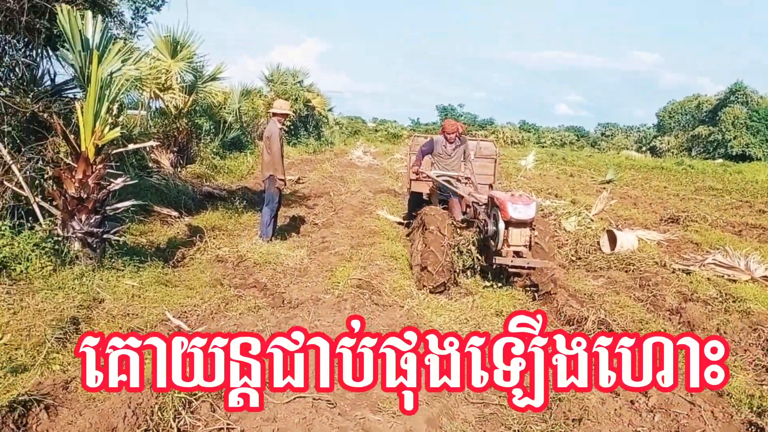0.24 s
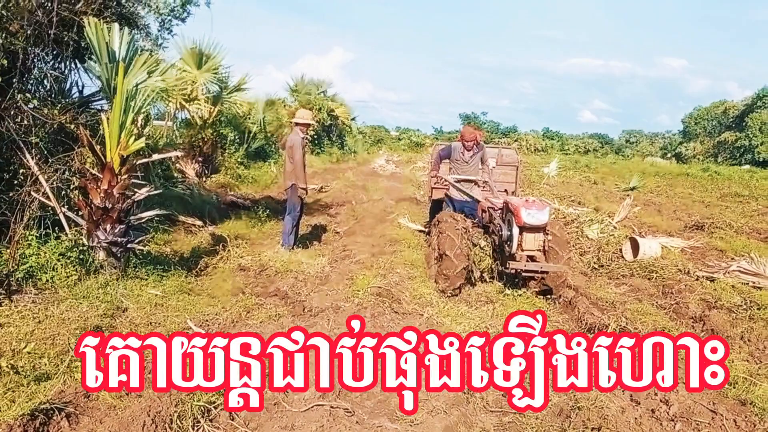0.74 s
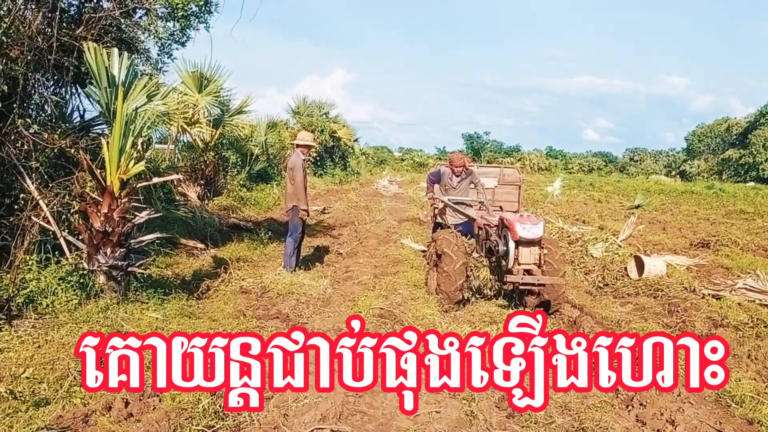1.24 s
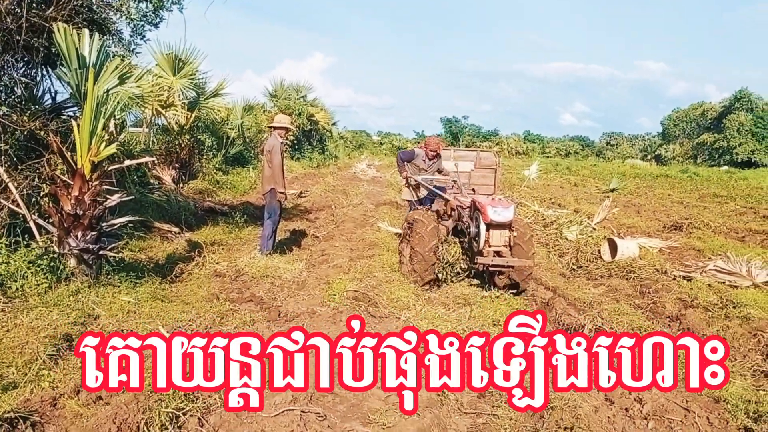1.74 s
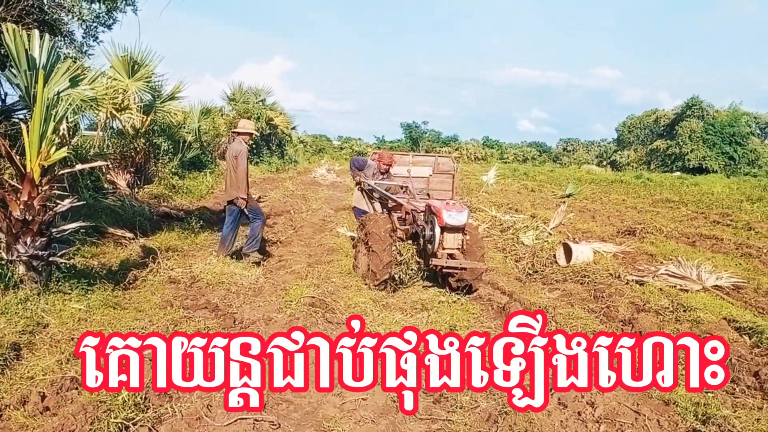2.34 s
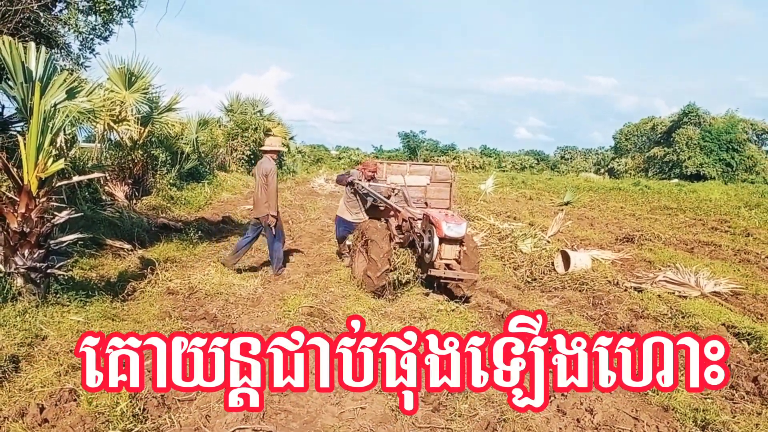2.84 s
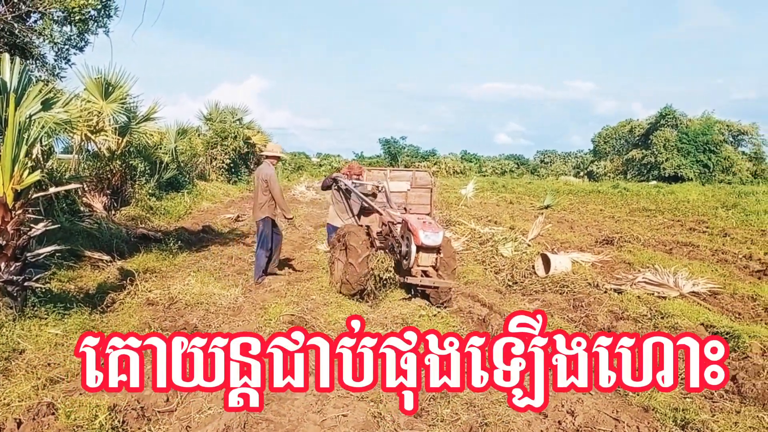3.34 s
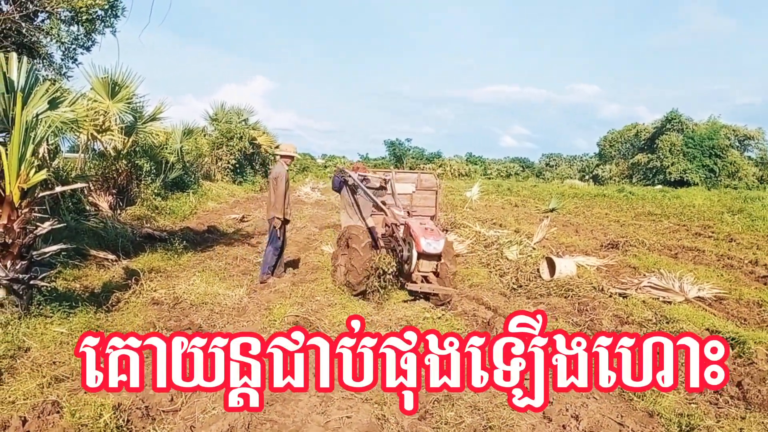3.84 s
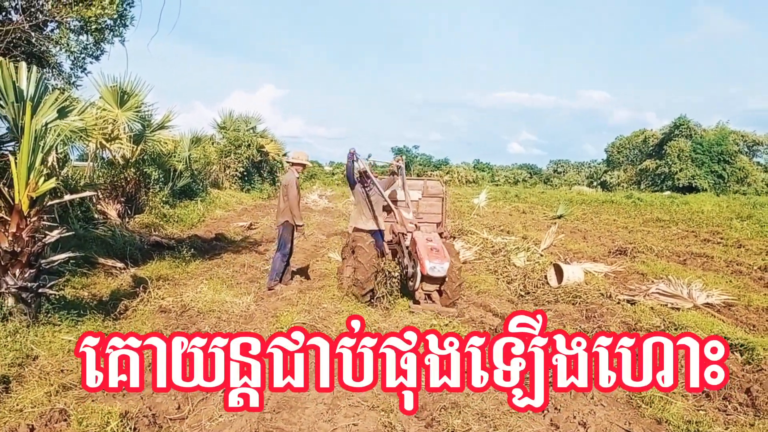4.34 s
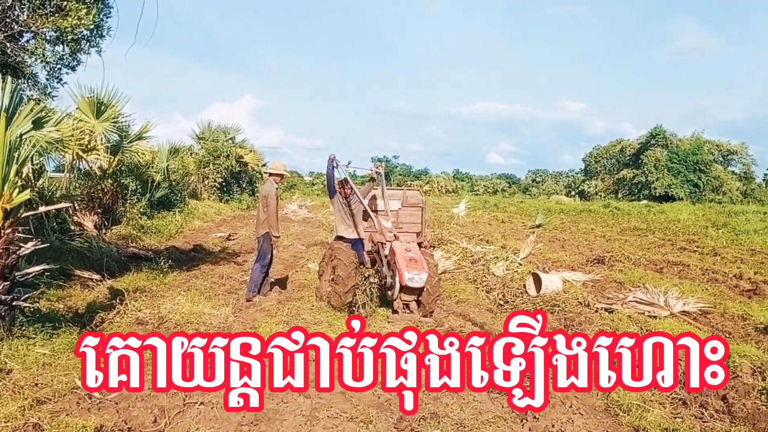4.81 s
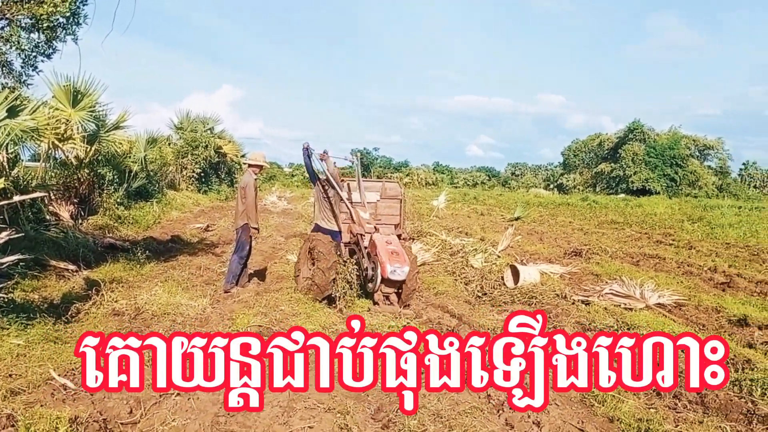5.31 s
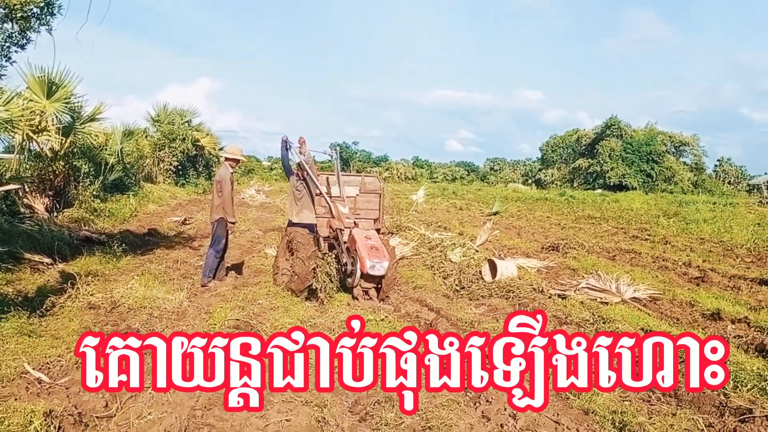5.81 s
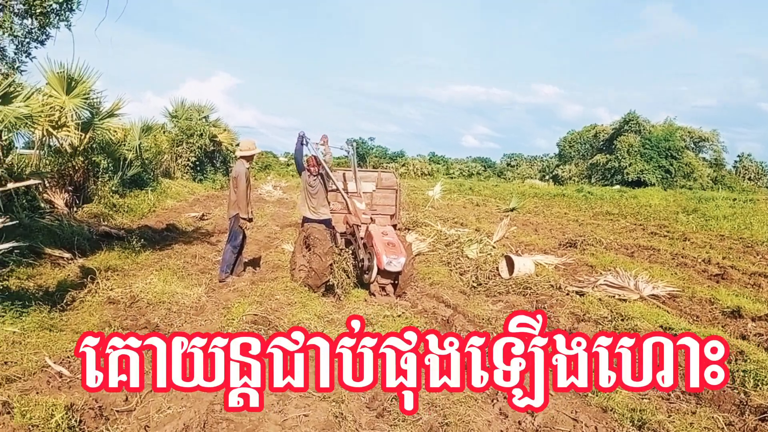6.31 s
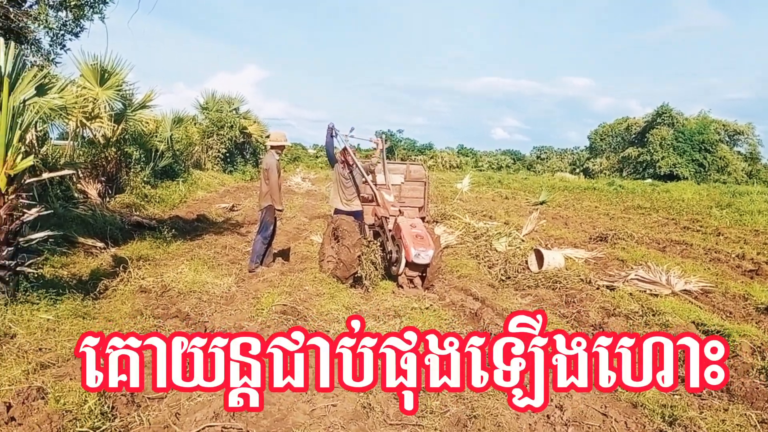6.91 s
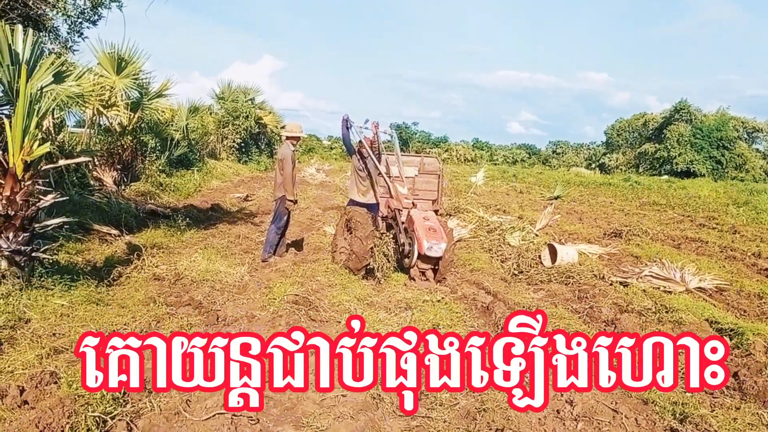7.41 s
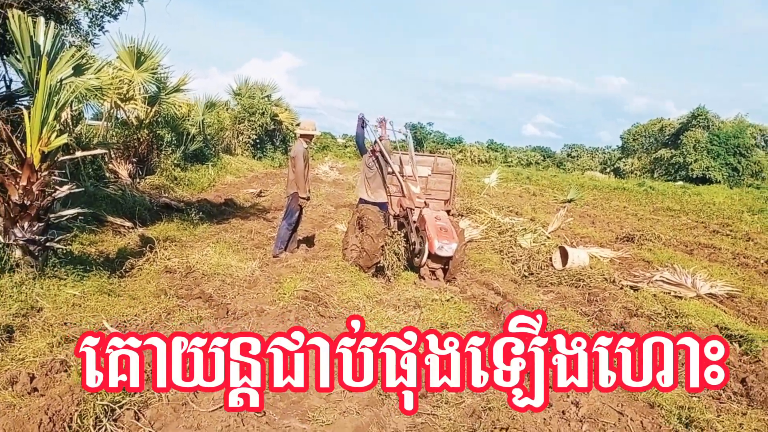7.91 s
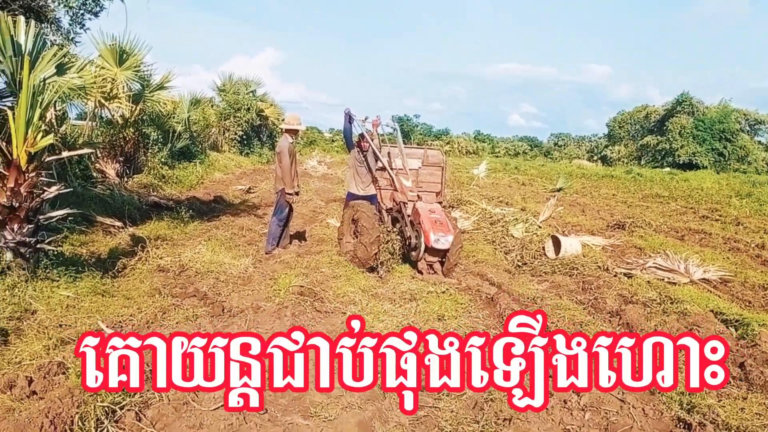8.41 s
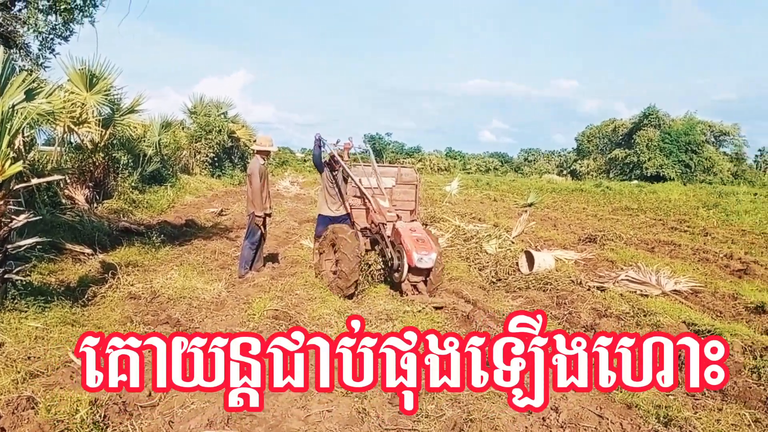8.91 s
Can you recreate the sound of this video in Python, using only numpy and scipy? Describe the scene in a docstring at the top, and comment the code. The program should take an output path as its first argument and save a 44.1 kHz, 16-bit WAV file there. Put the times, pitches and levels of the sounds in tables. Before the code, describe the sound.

A small single-cylinder diesel walking tractor labours in mud a few metres from the microphone in an open field. Deep hollow pops repeat nearly six times a second, with dull knocks, soft low thuds and ticking valves between. Gears grind underneath; a joint squeaks once early on, and loose metal clanks irregularly, more often from four seconds. The speed sags near five seconds, then recovers.

```python
"""Walking tractor in mud

A single-cylinder four-stroke diesel labours a few metres away in an open field, with faint wind.
Each cycle: combustion knock, muffled exhaust thud, loud intake pop, then the hum of the shut inlet pipe.
Filtered grit and struck modes make the valves, gears, guard and clanking frame; a joint squeaks once.
"""
import sys
import numpy as np
from scipy import signal
from scipy.io import wavfile
from scipy.ndimage import uniform_filter1d, minimum_filter1d

SR = 44100
rng = np.random.default_rng(int(sys.argv[2]) if len(sys.argv) > 2 else 0)


def inscribe(sig):
    """Save sig as 16-bit PCM at rate SR to the path in sys.argv[1].

    A 1-D sig is mono; a 2-D sig holds one channel per row.
    Samples are clipped to [-1, 1] before scaling.
    """
    pcm = np.round(np.clip(np.atleast_2d(sig).T, -1, 1) * 32767)
    wavfile.write(sys.argv[1], SR, pcm.astype(np.int16))


N = 403515
TIME = np.arange(N) / SR

# engine speed, sagging as the wheels dig in, rising as they slip: start_s, firings_per_s
SPEED = [(0.0, 5.97), (0.12, 6.162), (0.85, 5.61), (1.18, 5.659), (1.33, 5.826), (1.89, 5.682),
         (3.16, 6.016), (4.05, 5.808), (4.09, 5.723), (5.08, 5.225), (5.71, 5.548), (5.92, 5.8),
         (6.44, 5.836), (7.22, 5.642), (7.47, 6.14), (8.22, 5.887), (8.51, 5.395), (8.82, 5.236),
         (9.15, 5.434)]
# wind colour: freq_hz, relative_db
WIND = [(20, 3), (45, -11), (100, -9.5), (300, -6.5), (550, -4.5), (800, -37), (3000, -60)]
# valve gear and injector: cycles_after_pop, level_db (before BEARING), rise_s, decay_s
TICKS = [(-.33, -27.5, .005, .014), (-.17, -33.5, 0.011, 0.017), (-.035, -22, 0.0019, 0.0015),
         (.09, -35.5, 0.005, 0.0037), (0.256, -24.5, 0.0017, 0.0051)]
# gear strain, loudest as the wheels break free: start_s, level_db
GEAR_LEVEL = [(0, -25), (3, -26.4), (5.5, -28.2), (6.2, -27), (7.13, -29.5), (7.28, -22), (7.75, -28.5),
              (8.1, -26), (9.15, -27.5)]
# frame slack, which rattles when the wheels do not hold it taut: start_s, shake_db
SLACK = [(0, -18.5), (.4, -21), (.8, -35.5), (1.2, -13.5), (1.5, -33.5), (1.8, -32.5), (2, -21.5),
         (3.15, -23), (4.1, -33), (5, -20), (5.85, -18), (6.2, -40), (7.4, -28), (8.25, -28.5), (9.15, -18)]
# how the engine carries as the tractor slews: # start_s, valve_db (casing takes half), block_ring_db,
# ground_echo_db, guard_db
BEARING = [(0, 0.5, -2.5, -9, -51), (1.5, 6, 3.5, -8, -54), (3.7, 1.5, 2, -10, -48.5),
           (4.7, 1, -8, -12, -33.5), (5.6, -1, -3, -26.5, -30), (7, -1.5, -8.5, -25, -32.5),
           (9.15, -6, -1.5, -20, -32)]
# intake air resonances: freq_hz, relative_db, swell_s, swell_sharpness
INTAKE = [(311.6, 3, 0.0041, 4.14), (309, -29.5, 0.027, 1.5), (230.6, -21, 0.0099, 0.42),
          (403, -17, 0.018, 19)]
# hardness of the burn: start_s, knock_db
BURN = [(0, -16), (.54, -16), (.8, -21.5), (1.3, -17), (1.94, -24.5), (2.28, -17.5), (3.47, -17),
        (3.98, -18.5), (4.33, -22), (4.9, -19.5), (5.6, -20), (6.7, -24), (7.5, -24), (7.7, -19),
        (8.45, -24), (9.15, -16)]
# exhaust strength, lower when the engine runs light: start_s, thud_db
EFFORT = [(0, -17), (.8, -20), (1.2, -18), (3.3, -17.5), (4.3, -17.5), (6, -17), (6.9, -22.5), (7.4, -16),
          (7.56, -28), (7.72, -24), (8.23, -24), (8.4, -33), (8.58, -19), (9.15, -18.5)]
# blows in frame and hitch: start_s, boom_db, clank_db, jingle_db,
# jingle_decay_s (boom and clank scale it), ring_focus_hz
CLANKS = [(1.106, -40, -31, -27, 0.015, 1850), (1.28, -29, -23.5, -18.5, 0.016, 1500),
          (2.153, -40, -22.5, -24.5, 0.012, 1820), (3.173, -43, -24, -24, 0.0097, 1520),
          (3.943, -10, -23.5, -40, 0.0086, 1250), (3.957, -18.5, -21, -26, 0.013, 1120),
          (3.976, -19, -18.5, -35, 0.013, 1800), (4.006, -17.5, -45, -24.5, 0.0085, 1260),
          (4.209, -25, -36, -19.5, 0.0032, 3030), (4.562, -28, -7.5, -21.5, .009, 1840),
          (4.587, -15, -24, -26, 0.011, 1500), (4.713, -16.5, -21.5, -13.5, 0.0066, 1510),
          (4.729, -26, -24, -38, .015, 1100), (5.26, -39, -33, -18, 0.0058, 2000),
          (5.298, -32, -16, -17.5, 0.0057, 1740), (5.971, -39, -26, -21.5, 0.0089, 1240),
          (7.179, -58, -27, -23, 0.0056, 1790), (7.363, -27, -14.5, -14.5, 0.01, 1500),
          (7.405, -24, -21, -17, 0.0032, 1480), (7.694, -25.5, -28, -26, 0.0034, 1850),
          (8.074, -24, -17, -16, .0056, 1225), (8.216, -44, -21, -15.5, 0.012, 1260),
          (8.231, -38, -20.5, -26, .0098, 1550), (8.441, -20.5, -36, -30, 0.0083, 1260),
          (8.972, -44, -18, -27.5, 0.0037, 1870), (9.116, -28, -20, -31, .0089, 1850)]
# dry joint: start_s, pitch_hz, level_db
SQUEAK = [(1.27, 4400, -50), (1.295, 4290, -33), (1.34, 4110, -32), (1.4, 3900, -35), (1.43, 3820, -55)]
# bright splashes on the sharpest clanks: start_s, level_db, decay_s
SPLASHES = [(5.974, -46, .018), (8.072, -43, 0.016), (8.215, -41, 0.023)]
# centre of the band cancelled by the soil echo, moving as the tractor rocks: start_s, centre_hz
GROUND_DIP = [(0, 742), (3, 680), (4.3, 722), (5.4, 857), (6.3, 790), (7.5, 780), (9.15, 645)]

# colours of the parts: freq_hz, relative_db
VALVES = [(700, -24.5), (1100, -22), (1650, 1), (2050, -16.5), (2300, -20.5), (3500, -12), (4200, -6),
          (4800, 3), (5400, -8), (5900, 1), (6300, -8.5), (7050, -8.5), (7600, -21), (8400, -48.5)]
GEARS = [(25, -22.5), (60, -20), (120, -1), (330, 9.5), (520, 0), (750, -10.5), (1020, -1), (1700, -1.5),
         (2300, -14), (3500, -12.5), (4800, -5.5), (5900, -9.5), (7100, -23), (8200, -58)]
FRAME = [(120, -17.5), (250, -2), (500, 3.5), (750, -6.5), (1050, 2), (1250, -1), (1900, 0), (2300, -9),
         (3000, -6.5), (3600, -18.5), (5000, -36.5), (8000, -63.5)]
THROAT = [(400, -27), (600, 6), (750, -34), (1020, 6), (1350, 2), (1700, 5.5), (1950, -5.5), (2300, -17.5),
          (5000, -59.5)]
BLOCK = [(120, -28), (250, -16), (400, 4.5), (580, -2.5), (750, -21.5), (1000, -3), (1300, 0), (2050, -0.5),
         (2400, -5), (3300, -20.5), (4500, -7), (7000, -27.5), (8300, -69.5)]
CASING = [(900, -42.5), (2200, -6.5), (2700, -4), (3400, -1.5), (4200, 2.5), (4800, 6), (5400, 0),
          (5900, -6.5), (6400, -15), (7050, -9.5), (7600, -21.5), (8400, -43.5), (14000, -75.5)]
CHASSIS = [(40, -32.5), (100, -25.5), (190, 2.5), (300, 0), (400, -0.5), (600, -11), (900, -22.5),
           (1500, -40.5), (4000, -74)]
JINGLE = [(1500, -40), (2900, -3), (3700, 5.5), (4800, 16.5), (5800, 7), (7100, 1), (7800, -15),
          (8800, -40.5), (11500, -58), (15500, -44.5)]
SPLASH = [(5000, -15), (7500, 7), (9000, -2), (11000, -9), (12500, -27), (15500, -18)]

# covers, guards and tank: freq_hz, relative_db
SHEET_MODES = [(1120, -4), (1240, -4.5), (1440, -7), (1590, -2), (1730, -3.5), (1880, 1.5), (2070, 2.5),
               (2420, 1), (2740, 2.5), (3060, 1), (3450, -1.5), (3950, -2), (4250, -3), (4560, -0.5),
               (4810, -1.5), (5020, -5), (5330, -1.5), (5680, 1.5), (5920, 2), (6250, -4.5), (6620, 2.5),
               (7030, 1)]
# ringing of block, loose guard and frame: freq_hz, relative_db, t60_s
BLOCK_MODES = [(1300, -5, 0.025), (1564, -1, 0.083), (1865, 3, 0.1), (2085, -20.5, 0.044), (3280, -28, .1),
               (5600, -15.5, 0.16), (6000, -17, 0.17)]
GUARD_MODES = [(2060, -3, 0.077), (2590, -16, 0.52), (3190, -2.5, 0.096), (3700, -4.5, 0.071)]
FRAME_MODES = [(1040, -10, 0.03), (1248, 3.5, 0.059), (1510, -4, 0.077), (1840, -1, 0.05), (3340, 4.5, .07),
               (4900, -11, .07)]

FIRST_POP_S, USUAL_FIRINGS_PER_S = .121, 5.75
# places in cycles after the intake pop
FIRES, PUFFS, BLOWS_DOWN, RECOILS, INLET_SHUTS = -.503, -.38, -.305, -.278, .262
# the faster the engine runs, the harder it gulps air
POP_DB, POP_DB_PER_FIRING_RATE, POP_SCATTER_DB = -6, 3, 0.6
GROUND_ECHO_S = .0054
HUM_RE_POP_DB, RASP_RE_POP_DB, PUFF_RE_THUD_DB = -12, -16.5, -8.5
KNOCK_SCATTER_DB = 0.44
# the casing follows the slack in part
CLATTER_DB, CLATTER_SLACK_SHARE, CLATTER_SCATTER_DB = -23, 0.13, 0.8
THUD_HZ, DIP_WIDTH_HZ, BAND_EDGE_HZ = 119.9, 253, 15700


def gain_of(db):
    """Amplitude factor of a level in dB."""
    return 10 ** (np.asarray(db) / 20)


def evened(x):
    """Scales to rms 1."""
    return x / np.sqrt(np.mean(x ** 2) + 1e-20)


def curve(rows, column=1, t=TIME):
    """Interpolates a table column linearly over time."""
    rows = np.asarray(rows)
    return np.interp(t, rows[:, 0], rows[:, column])


def add(mix, s, sound):
    """Lays a sound into the mix at time s."""
    start = round(s * SR)
    sound = sound[max(-start, 0):]
    part = mix[max(start, 0):][:len(sound)]
    part += sound[:len(part)]


def colour(x, points, size=4096):
    """Causal minimum-phase filter of unit energy with the given spectrum."""
    point_hz, point_db = np.transpose(points)
    freq_hz = abs(np.fft.fftfreq(size, 1 / SR))
    log_gain = np.log(gain_of(np.interp(np.log(freq_hz + 1), np.log(point_hz), point_db)))
    log_gain -= 2 * np.log(np.maximum(freq_hz / point_hz[-1], 1))  # steeper above the last point
    spectrum = np.exp(np.conj(signal.hilbert(log_gain)))
    response = np.fft.ifft(spectrum).real[:size // 2]
    return signal.oaconvolve(x, response / np.linalg.norm(response))[:N]


def grit(per_s, spread_db):
    """Tiny contacts of uneven size as random impulses, rms 1."""
    size = gain_of(spread_db * np.minimum(rng.exponential(1, N), 3))
    sign = rng.choice([-1., 1.], N)
    return evened(size * sign * (rng.random(N) < per_s / SR))


def blows(times_s, level_db, rise_s, decay_s):
    """Envelope of blows that swell and die away; their powers add."""
    t, power = np.arange(SR // 4) / SR, np.zeros(N)
    for s, gain, fall_s in zip(times_s, gain_of(level_db), decay_s * np.ones(len(times_s))):
        rise = np.minimum(t / rise_s, 1)
        fall = np.exp(-np.maximum(t - rise_s, 0) / fall_s)
        add(power, s, (gain * rise * fall) ** 2)
    return np.sqrt(power)


def air_ring(hz, swell_s, sharpness):
    """An air column that swells to its peak and dies away."""
    t = np.arange(SR // 4) / SR
    return np.sin(2 * np.pi * hz * t) * (t / swell_s * np.exp(1 - t / swell_s)) ** sharpness


def contacts(envelope, noise_db, ring_db, per_s, width_hz):
    """Metal on metal: fine grit, and sparse taps that each ring one mode of the sheet steel."""
    rings, radius = np.zeros(N), np.exp(-np.pi * width_hz / SR)
    for hz, db in SHEET_MODES:
        at, size = rng.integers(0, N, 4000), rng.standard_normal(4000)
        taps = np.bincount(at, size * (np.arange(len(at)) < per_s * N / SR), N)
        angle = 2 * np.pi * hz / SR
        unit = 2 * np.sin(angle) * np.sqrt(1 - radius)
        poles = [1, -2 * radius * np.cos(angle), radius ** 2]
        rings += gain_of(db) * signal.lfilter([unit], poles, evened(taps) * envelope + 1e-12)
    noise = gain_of(noise_db) * envelope * grit(per_s=4000, spread_db=2.5)
    return noise + gain_of(ring_db) * rings / np.sqrt(len(SHEET_MODES))


def struck(times_s, levels_db, modes, scatter_db, focus_hz=None, focus_db=0):
    """Blows ring the modes in varying proportions; modes off focus lose focus_db an octave."""
    t, out = np.arange(SR // 4) / SR, np.zeros(N)
    for k, (s, level_db) in enumerate(zip(times_s, levels_db)):
        for hz, db, t60_s in modes:
            spread, detune, phase = rng.standard_normal(3)
            away_db = 0 if focus_hz is None else focus_db * abs(np.log2(hz / focus_hz[k]))
            tone = np.sin(2 * np.pi * (hz * (1 + 0.0025 * detune) * t + phase))
            envelope = np.minimum(t / 0.0021, 1) * np.exp(-np.log(1000) * t / t60_s)
            mode_db = level_db + db - away_db + scatter_db * np.tanh(spread)
            add(out, s, gain_of(mode_db) * tone * envelope)
    return out


def crank(place):
    """Times at which each engine cycle reaches a place, in cycles after the intake pop."""
    t = np.arange(-SR, N + SR, 64) / SR
    cycle = np.cumsum(curve(SPEED, t=t)) * (t[1] - t[0])
    cycle -= np.interp(FIRST_POP_S, t, cycle)
    numbers = np.arange(-1, np.interp(TIME[-1], t, cycle) + 1)
    return np.interp(numbers + place, cycle, t)


def chance(spread):
    """One random deviation for each cycle."""
    return spread * rng.standard_normal(len(crank(0)))


def wind():
    """A faint lumpy rumble of filtered noise, its noise independent in the two channels."""
    gust_db = 3 * np.interp(TIME, np.linspace(0, TIME[-1], 50), rng.standard_normal(50))
    return gain_of(-71.0 + gust_db) * np.array([colour(rng.standard_normal(N), WIND) for _ in range(2)])


def mechanics():
    """Valves tick with the crank, gears grind on, and the recoil of each firing shakes the frame."""
    power = np.zeros(N)
    for place, db, rise_s, decay_s in TICKS:
        times_s = crank(place + chance(0.0027))
        power += blows(times_s, db + chance(1.8), rise_s, decay_s) ** 2
    strokes = np.sqrt(power) * gain_of(curve(BEARING))
    valves = contacts(strokes, noise_db=-7.5, ring_db=-6.5, per_s=99, width_hz=83)

    pops_s = crank(0)
    cycle = np.interp(TIME, pops_s, np.arange(len(pops_s)))
    load_db = 1.8 * np.cos(2 * np.pi * (cycle + 0.16))  # the flywheel runs fastest after the power stroke
    grind = gain_of(curve(GEAR_LEVEL) + load_db)
    gears = contacts(grind, noise_db=-4.5, ring_db=-5.5, per_s=60, width_hz=38.0)

    kicks_s = crank(RECOILS + chance(0.0031))
    recoil = blows(kicks_s, curve(SLACK, t=kicks_s) + chance(1.5), rise_s=0.0013, decay_s=0.0086)
    shake = contacts(recoil, noise_db=0, ring_db=-11.5, per_s=720, width_hz=110)
    return colour(valves, VALVES) + colour(gears, GEARS) + colour(shake, FRAME)


def intake():
    """The piston gulps air: a deep pop with a rasp; when the valve shuts, the closed pipe hums."""
    pops_s, out = crank(0), np.zeros(N)
    speed_excess = curve(SPEED, t=pops_s) - USUAL_FIRINGS_PER_S
    pop_db = POP_DB + POP_DB_PER_FIRING_RATE * speed_excess + chance(POP_SCATTER_DB)
    pop = sum(gain_of(db) * air_ring(hz, swell_s, sharp) for hz, db, swell_s, sharp in INTAKE)
    for s, db, echo_db in zip(pops_s, pop_db, curve(BEARING, 3, pops_s)):
        add(out, s, -gain_of(db) * pop)
        add(out, s + GROUND_ECHO_S, -gain_of(db + echo_db) * pop)  # echo of the pop off the ground

    t = np.arange(SR // 4) / SR
    shutting = 1 - np.exp(-(t / 0.0059) ** 2)
    for s, db, detune in zip(crank(INLET_SHUTS), pop_db + chance(0.4), chance(0.015)):
        hum = np.sin(2 * np.pi * 184 * (1 + detune) * t) * np.exp(-t / 0.042)
        overtone = np.sin(2 * np.pi * 385 * (1 + 2 * detune) * t) * np.exp(-t / 0.056)
        add(out, s, gain_of(db + HUM_RE_POP_DB) * shutting * (hum + gain_of(-12) * overtone))

    rasp = blows(pops_s - .001, pop_db + RASP_RE_POP_DB, rise_s=0.0018, decay_s=0.011)
    return out + colour(rasp * grit(per_s=9000, spread_db=-0.5), THROAT)


def knock():
    """Combustion hammers the block, sets the iron ringing and makes the casing clatter."""
    fired_s = crank(FIRES)
    knock_db = curve(BURN, t=fired_s) + chance(KNOCK_SCATTER_DB)
    slack_db = curve(SLACK, t=fired_s)
    clatter_db = CLATTER_DB + CLATTER_SLACK_SHARE * (slack_db - slack_db.mean())
    clatter_db += .5 * curve(BEARING, 1, fired_s) + chance(CLATTER_SCATTER_DB)
    hammer = blows(fired_s, knock_db, rise_s=0.0057, decay_s=0.019)
    hammer = contacts(hammer, noise_db=1.5, ring_db=-19, per_s=450, width_hz=67)
    clatter = blows(fired_s, clatter_db, rise_s=0.0044, decay_s=0.017)
    clatter = contacts(clatter, noise_db=0, ring_db=-10.5, per_s=130, width_hz=57)
    ring = struck(fired_s, knock_db + curve(BEARING, 2, fired_s), BLOCK_MODES, scatter_db=-2.5)
    return colour(hammer, BLOCK) + colour(clatter, CASING) + ring


def guard():
    """The loose guard rings with the knock, and again with the recoil."""
    times_s = np.r_[crank(-.49), crank(-.28)]
    return struck(times_s, curve(BEARING, 4, times_s), GUARD_MODES, scatter_db=9.5)


def exhaust():
    """The silencer turns each blow-down into a soft thud, with a little turbulence."""
    opens_s, out = crank(BLOWS_DOWN), np.zeros(N)
    thud_db = curve(EFFORT, t=opens_s)
    for s, db, hz in zip(opens_s, thud_db, THUD_HZ * (1 + chance(.025))):
        add(out, s, gain_of(db) * air_ring(hz, swell_s=0.017, sharpness=3.76))
    puff_db = thud_db + PUFF_RE_THUD_DB + chance(2.5)
    puff = blows(crank(PUFFS), puff_db, rise_s=0.0079, decay_s=0.026)
    return out + colour(puff * grit(per_s=9000, spread_db=0.0), CHASSIS)


def clanks():
    """Loose parts collide: the chassis booms, the frame clanks and rings, thin steel jingles."""
    s, boom_db, clank_db, jingle_db, decay_s, focus_hz = np.transpose(CLANKS)
    boom = blows(s, boom_db, rise_s=0.0055, decay_s=decay_s * 4.0) * grit(per_s=4100, spread_db=2.0)
    clank = blows(s, clank_db, rise_s=0.0013, decay_s=decay_s * 2.15)
    clank = contacts(clank, noise_db=-2.5, ring_db=-13, per_s=290, width_hz=100)
    jingle = blows(s, jingle_db, rise_s=0.0026, decay_s=decay_s)
    jingle = contacts(jingle, noise_db=1.5, ring_db=-10.0, per_s=440, width_hz=150)
    ring = struck(s, clank_db + 5.5, FRAME_MODES, scatter_db=1.5, focus_hz=focus_hz, focus_db=24)
    return colour(boom, CHASSIS) + colour(clank, FRAME) + colour(jingle, JINGLE) + ring


def squeak():
    """A dry joint squeaks: one thin falling sine."""
    sounding = (TIME > SQUEAK[0][0]) & (TIME < SQUEAK[-1][0])
    tone = np.sin(2 * np.pi * np.cumsum(curve(SQUEAK)) / SR)
    return sounding * gain_of(curve(SQUEAK, 2)) * tone


def splashes():
    """Short, faint sizzles of grit at the top of the range."""
    s, level_db, decay_s = np.transpose(SPLASHES)
    sizzle = blows(s, level_db, rise_s=.004, decay_s=decay_s) * grit(per_s=5600, spread_db=3.0)
    return colour(sizzle, SPLASH)


def over_ground(x):
    """The echo off the soil cancels one band: shift it to 0 Hz, low-pass, shift back, subtract."""
    carrier = np.exp(2j * np.pi * np.cumsum(curve(GROUND_DIP)) / SR)
    pole = np.exp(-np.pi * DIP_WIDTH_HZ / SR)
    band = signal.lfilter([1 - pole], [1, -pole], x / carrier + 1e-18)
    return x - 2 * (carrier * band).real


def field(x, t60_s, delay_s):
    """Faint scatter from the surroundings: convolution with a decaying noise tail."""
    t = np.arange(SR // 4) / SR
    tail = rng.standard_normal(len(t)) * np.exp(-np.log(1000) * t / t60_s) * (t > delay_s)
    return signal.oaconvolve(x, tail / np.linalg.norm(tail))[:N]


def scene():
    """Sums air, metal and wind; the scatter has opposite signs in the two channels."""
    air = intake() + exhaust()
    engine = over_ground(knock() + mechanics() + guard())
    metal = engine + clanks() + splashes() + squeak()
    side = field(gain_of(-15.3) * metal + gain_of(-33) * air, t60_s=.1, delay_s=.001)
    return air + metal + np.array([side, -side]) + wind()


def record(dry):
    """A quick limiter holds the loudest peaks; then the band limit."""
    room = np.minimum(1, .95 / (abs(dry).max(axis=0) + 1e-9))
    limited = dry * uniform_filter1d(minimum_filter1d(room, size=161), size=161)
    low_pass = signal.firwin(511, BAND_EDGE_HZ, window=("kaiser", 9), fs=SR)
    return signal.oaconvolve(limited, low_pass[None], "same")


dry = scene()
out = record(dry)
inscribe(out)
```